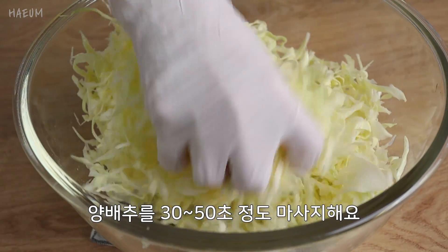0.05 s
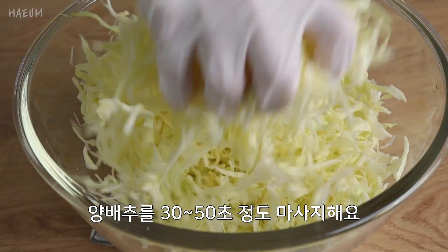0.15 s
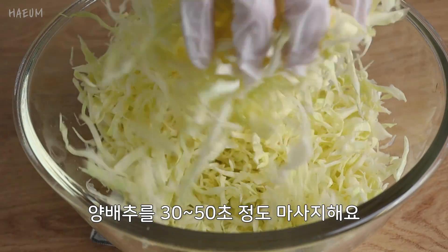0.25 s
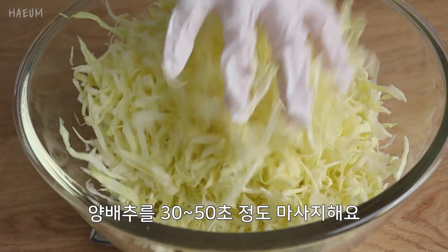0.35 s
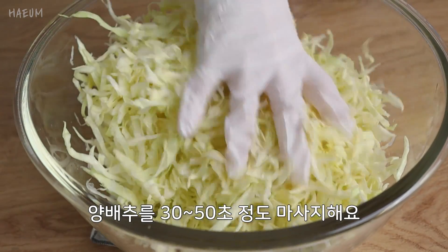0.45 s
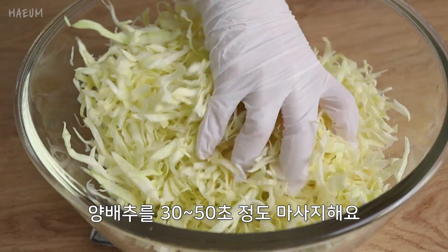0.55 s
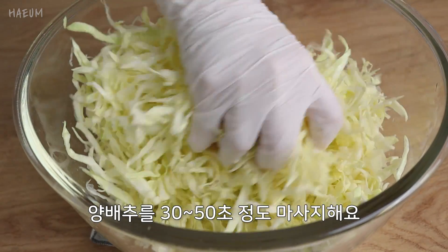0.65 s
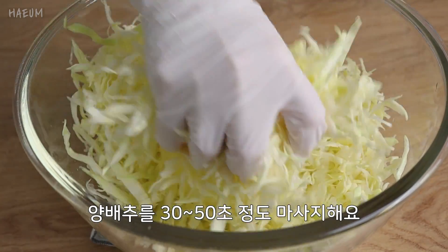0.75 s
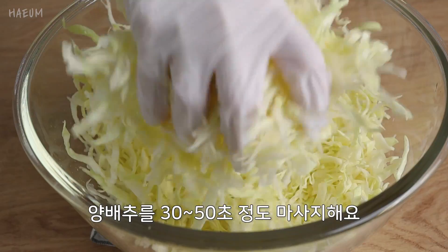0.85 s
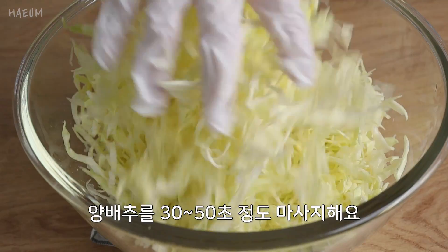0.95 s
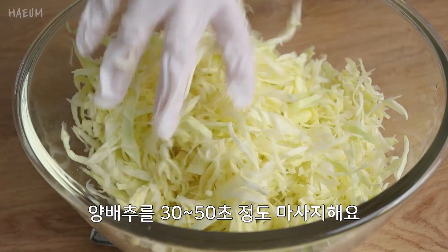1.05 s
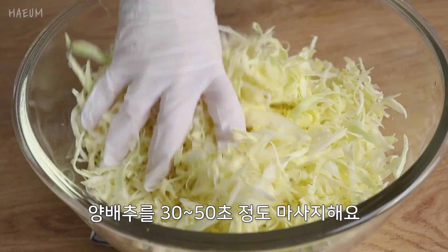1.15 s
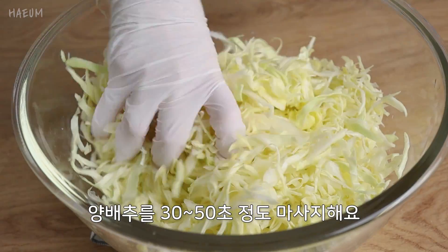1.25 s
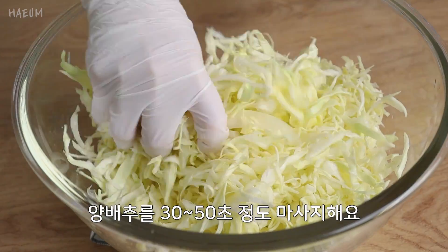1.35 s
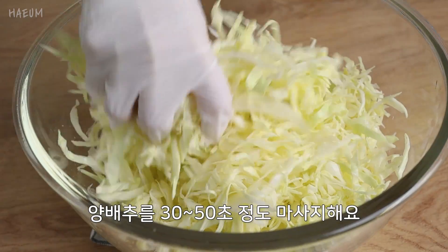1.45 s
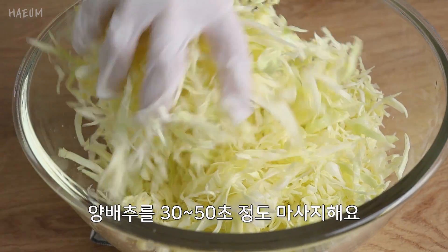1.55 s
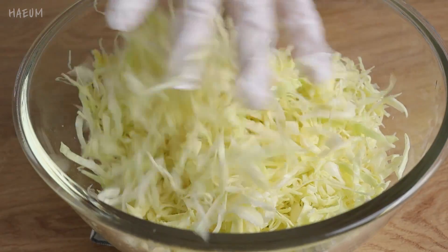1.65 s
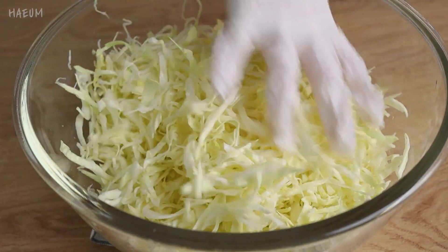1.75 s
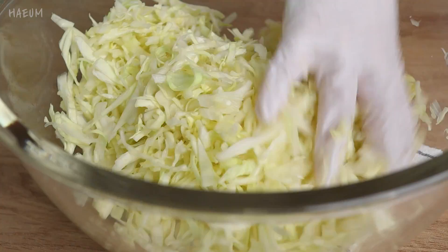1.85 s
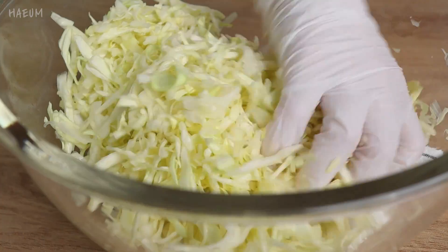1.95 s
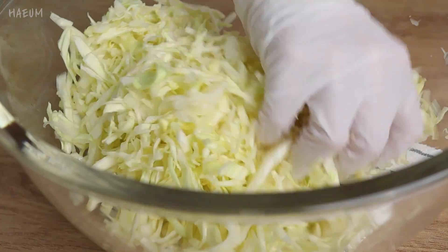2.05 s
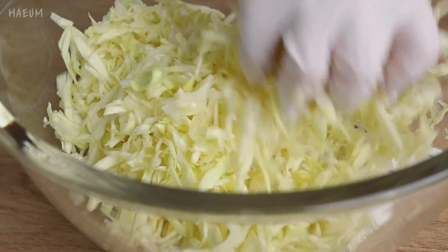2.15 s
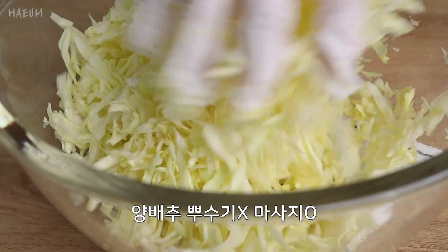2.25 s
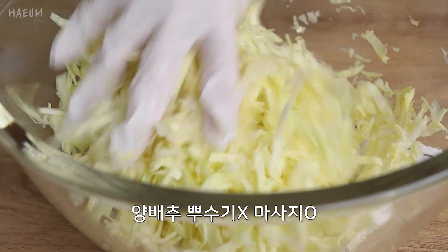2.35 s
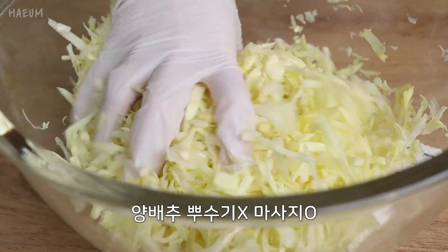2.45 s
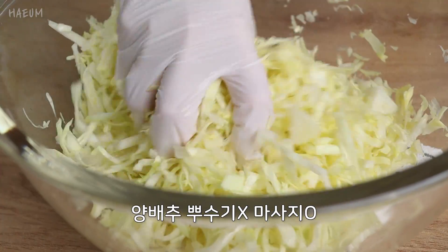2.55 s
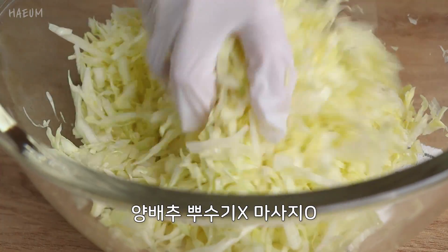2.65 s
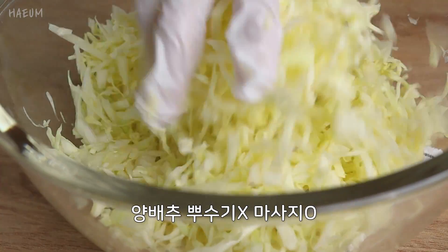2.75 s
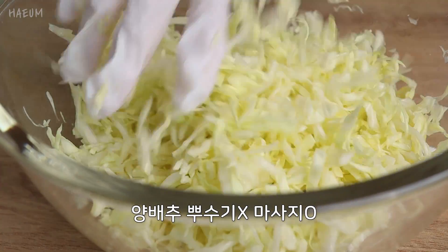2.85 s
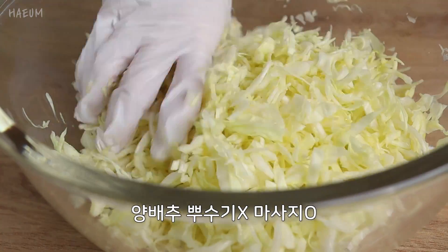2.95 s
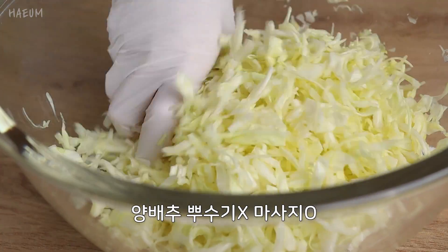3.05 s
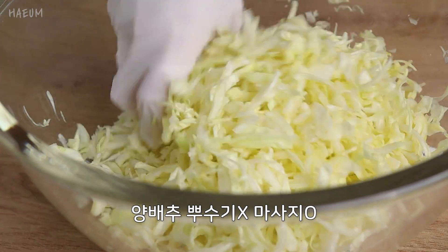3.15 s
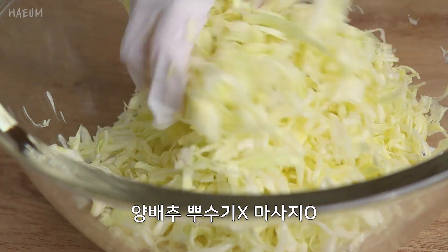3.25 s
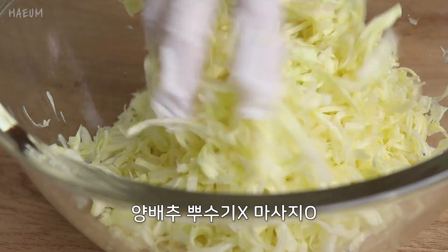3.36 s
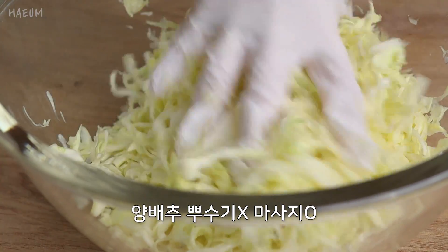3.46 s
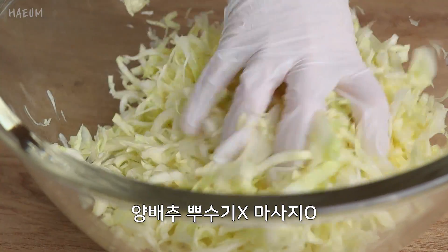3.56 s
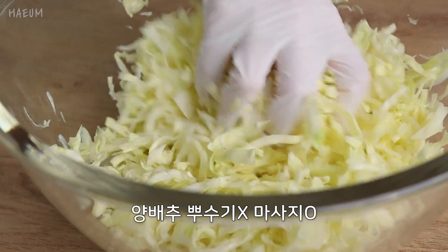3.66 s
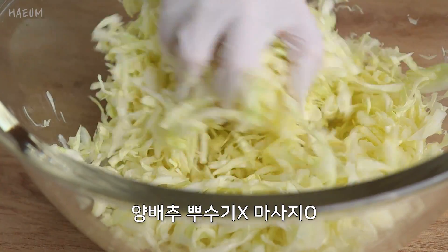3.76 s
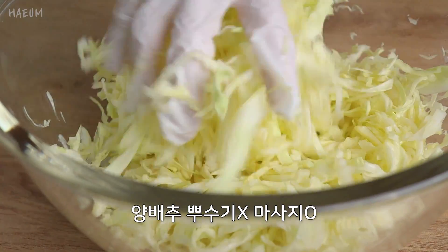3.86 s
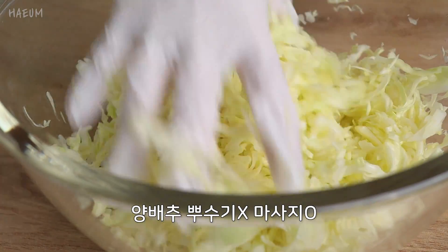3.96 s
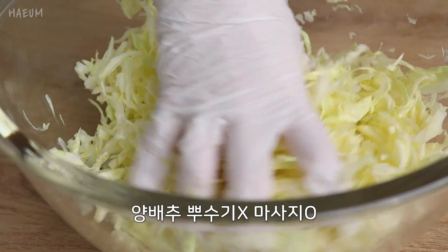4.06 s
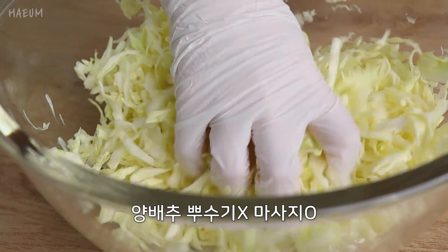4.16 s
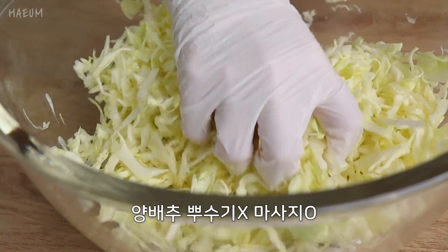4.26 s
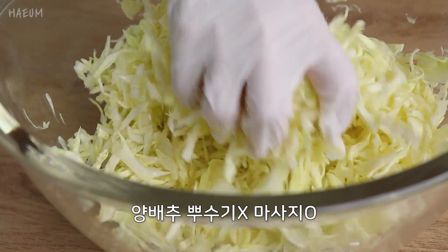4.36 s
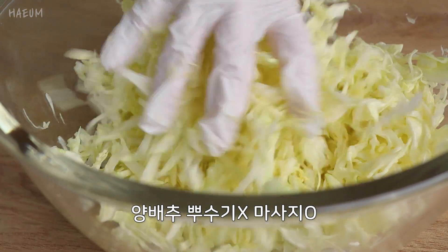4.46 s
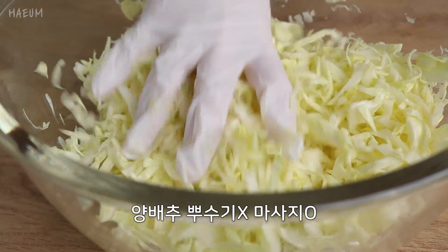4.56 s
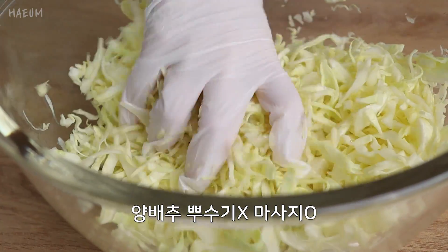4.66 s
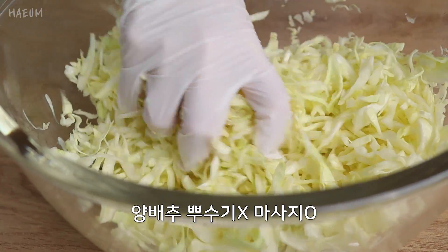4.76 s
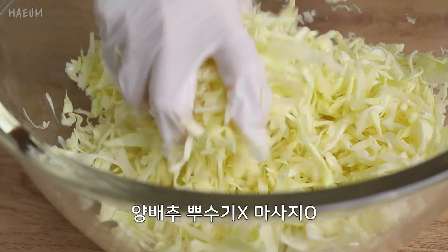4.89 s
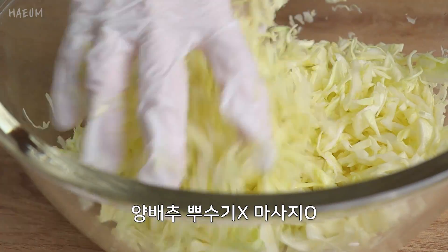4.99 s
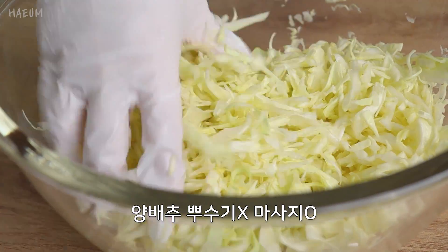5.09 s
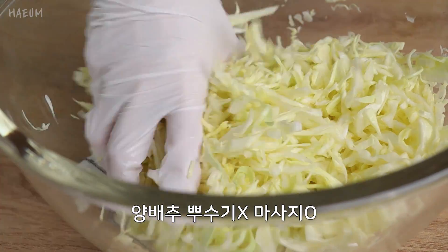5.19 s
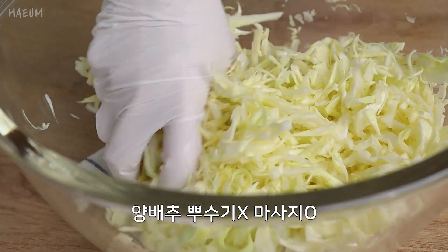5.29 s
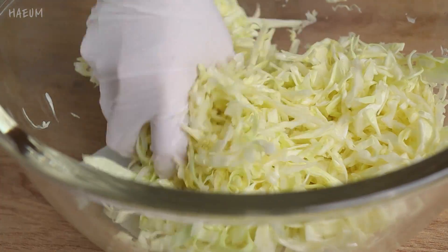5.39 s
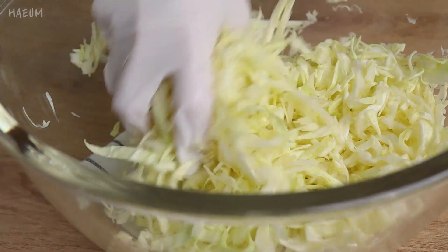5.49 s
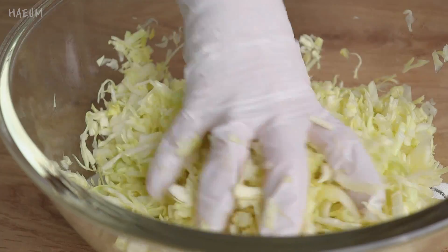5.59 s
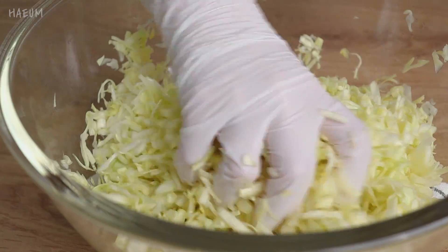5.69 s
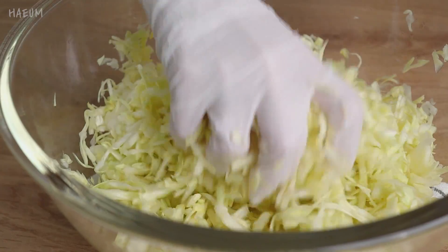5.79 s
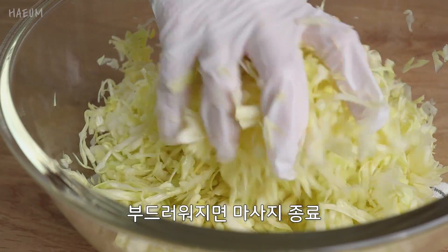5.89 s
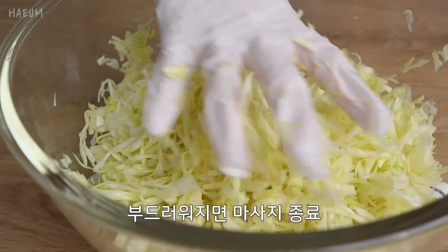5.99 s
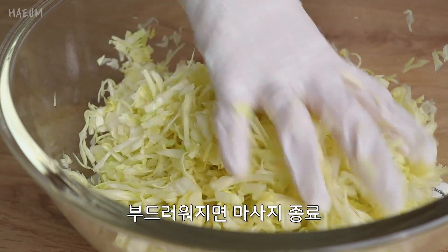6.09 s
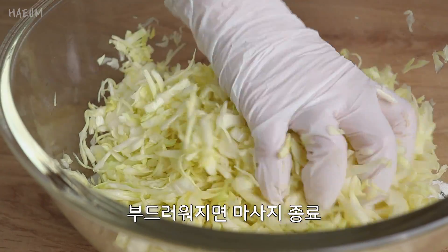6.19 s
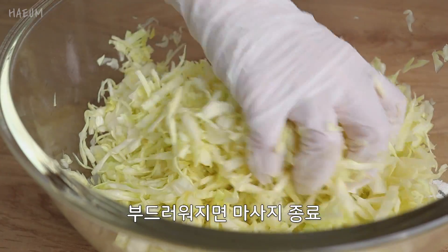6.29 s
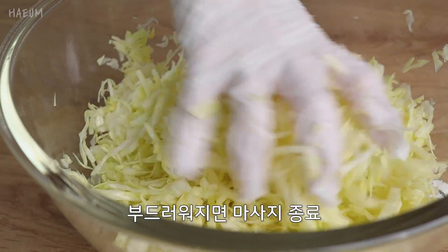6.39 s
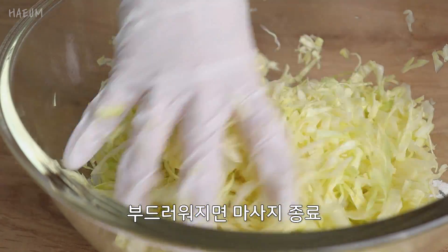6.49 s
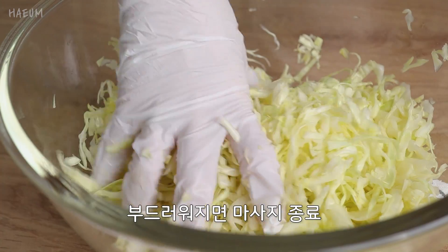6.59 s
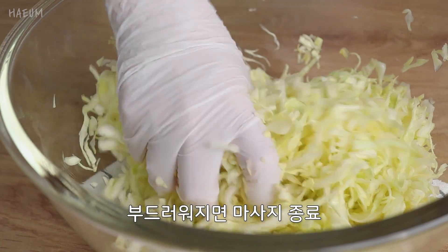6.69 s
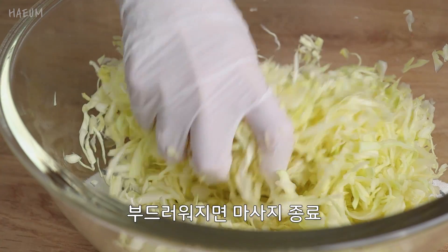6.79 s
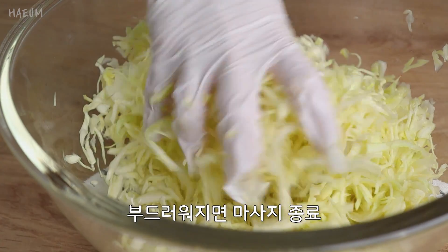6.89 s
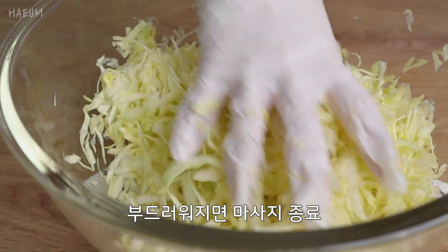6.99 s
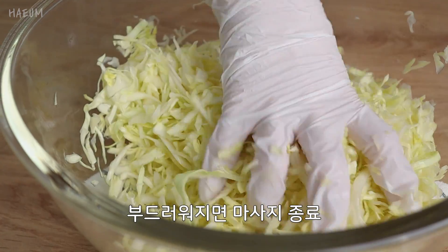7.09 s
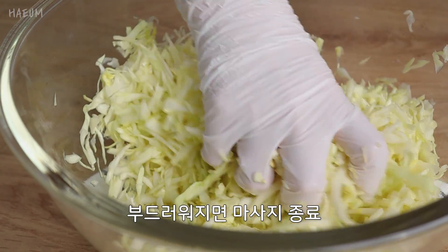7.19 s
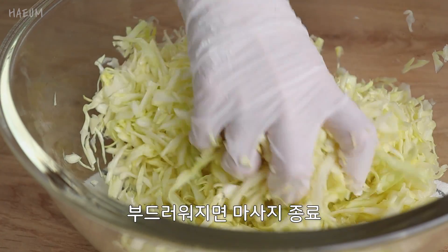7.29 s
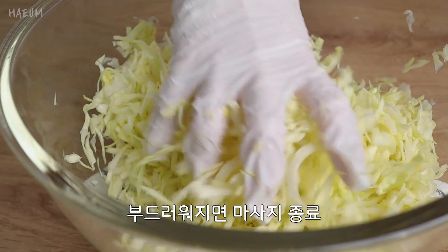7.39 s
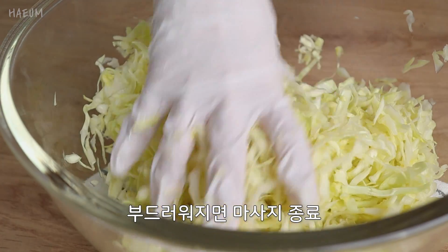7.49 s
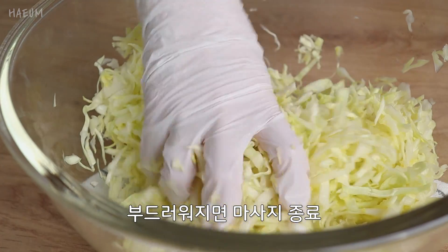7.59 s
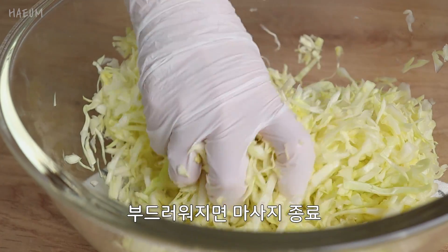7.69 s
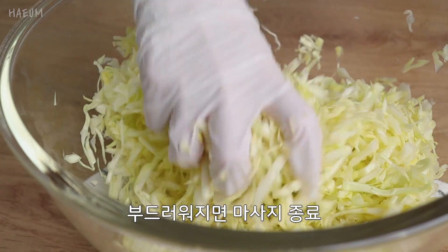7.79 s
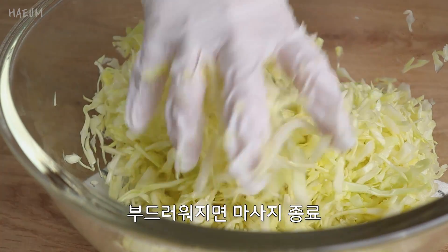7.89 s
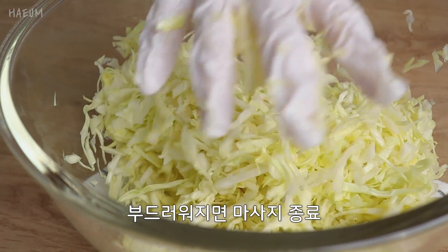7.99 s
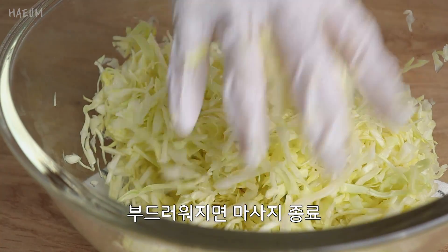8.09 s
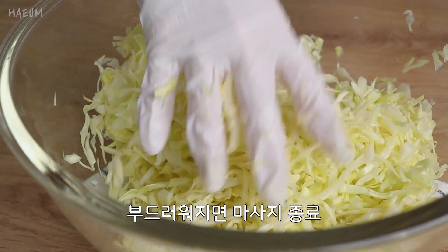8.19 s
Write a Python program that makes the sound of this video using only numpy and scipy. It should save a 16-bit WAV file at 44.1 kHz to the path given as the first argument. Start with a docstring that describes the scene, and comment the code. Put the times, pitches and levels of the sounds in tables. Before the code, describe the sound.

A gloved hand rhythmically squeezes shredded cabbage in a glass bowl, with wet dense crunches, crisp snaps and soft low thumps in a quiet kitchen.

```python
"""In a quiet kitchen, a gloved hand squeezes salted shredded cabbage in a glass bowl on a wooden table.
About twice a second the grip closes: swarms of tiny fractures give a dull slide, a dense crunch and a
fine wet fizz, built as random impulses through minimum-phase filters; single shreds snap and tick.
The push excites resonances of the bowl, its seat and the table; a faint low drone swells once.
A close microphone pair hears it all over steady background noise and a short, faint reverberant tail."""
import sys
import numpy as np
from scipy import signal
from scipy.fft import rfft, irfft, next_fast_len
from scipy.io import wavfile
from scipy.ndimage import uniform_filter1d

SR = 44100
rng = np.random.default_rng(int(sys.argv[2]) if len(sys.argv) > 2 else 0)


def dump_mix(stems):
    """Bounce the given channels to the path in sys.argv[1] as a 16-bit WAV at rate SR."""
    frames = np.atleast_2d(stems).T  # one column per channel
    limited = np.clip(frames, -1, 1)  # hard clip at full scale
    pcm = np.round(limited * 32767).astype(np.int16)
    wavfile.write(sys.argv[1], SR, pcm)


N = 363384
TIME = np.arange(N) / SR
TAPS = 1024  # length of one fracture in samples


def amp(db):
    """Logarithmic level: decibels to amplitude gain."""
    return 10 ** (np.asarray(db) / 20)


def unit(x):
    """Normalisation to an rms amplitude of 1."""
    return x / np.sqrt(np.mean(x ** 2) + 1e-20)


def read(points, hz):
    """Interpolation of a spectrum table on a logarithmic frequency axis."""
    f, value = np.transpose(points)
    return np.interp(np.log(hz + 1), np.log(f + 1), value)


def add(mix, s, sound):
    """Superposition: mixes a sound in at time s, or at the start if s is negative."""
    part = mix[..., max(round(s * SR), 0):][..., :sound.shape[-1]]
    part += sound[..., :part.shape[-1]]


def shape(x, gain):
    """Linear filtering: multiplies the spectrum by a gain given as a function of frequency."""
    size = next_fast_len(N + 4096)
    hz = np.fft.rfftfreq(size, 1 / SR) + 1e-3
    return irfft(rfft(x, size) * gain(hz), size)[..., :N]


def wander(rate_hz):
    """Low-passed noise: smooth random fluctuation of rms 1."""
    noise = rng.standard_normal(N)
    return unit(shape(noise, lambda f: 1 / (1 + (f / rate_hz) ** 2)))


def steady(x, size):
    """Envelope normalisation: evens out the slow level of a signal pair and leaves the fine grain."""
    power = uniform_filter1d(x[0] ** 2, size)
    power = uniform_filter1d(power, size)
    return x / np.sqrt(abs(power) + 1e-12)


# Spectrum of the kitchen background: f/Hz, level/dB (per Hz, relative)
HUSH_SPECTRUM = [(20, -4), (60, 7), (100, -41), (171, -4.5), (220, -10.5), (420, -13), (580, -7.5),
                 (800, -12.5), (1050, -15.5), (1400, -21), (5000, -25), (16000, -41.5)]


def hush(level_db=-74):
    """Stationary noise: random samples filtered to the spectrum of the room's background."""
    noise = rng.standard_normal((2, N))
    return amp(level_db) * unit(shape(noise, lambda f: amp(read(HUSH_SPECTRUM, f))))


def kitchen(x, wet_db=-23, t60=0.072):
    """Reverberation: exponentially decaying noise stands for the table top and the nearby walls."""
    t = np.arange(SR // 3) / SR
    tail = rng.standard_normal((2, len(t))) * amp(-60 * t / t60) * (t > .005)
    tail /= np.linalg.norm(tail, axis=1, keepdims=True)
    return amp(wet_db) * signal.oaconvolve(x[None], tail, axes=1)[:, :N]


def drone(at_s=3.84, length_s=0.2, pitch_hz=160, width_hz=14, level_db=-71):
    """Narrow-band noise: a faint low drone swells once and fades."""
    noise = rng.standard_normal(N)
    tone = unit(shape(noise, lambda f: np.exp(-((f - pitch_hz) / width_hz) ** 2 / 2)))
    return amp(level_db) * tone * np.exp(-((TIME - at_s) / length_s) ** 2)


# The hand leans on the bowl: t/s (heaviest), level/dB
PUSHES = [(.05, -51.5), (.71, -49), (1.43, -50), (1.94, -60), (2.07, -55), (2.61, -51), (3.11, -52.5),
          (3.69, -56), (4.19, -53.5), (4.83, -49.5), (5.43, -45.5), (5.77, -41.5), (6.35, -48), (6.79, -42),
          (7.27, -46), (7.75, -43.5), (8.21, -61.5)]
LEAN_DB_PER_S, EASE_DB_PER_S, REST_DB = 188.5, 140, -76


def weight():
    """Loading and unloading: the hand's weight on the bowl, as a level in dB, builds and eases off."""
    db = np.full(N, float(REST_DB))
    for s, top_db in PUSHES:
        drop = np.maximum((s - TIME) * LEAN_DB_PER_S, (TIME - s) * EASE_DB_PER_S)
        db = np.maximum(db, top_db - drop)
    return db


# Shoves that rock the table: t/s, level/dB (before decay and onset)
SHOVES = [(0.559, -50), (1.402, -47.5), (2.487, -42), (3.043, -40.5), (4.129, -44), (5.326, -50.5),
          (5.724, -28.5), (6.649, -43.5), (6.829, -38.5), (7.7, -43.5)]


def table(rock_hz=31, rock_t60=0.74, rise_s=0.0062, thud_hz=72):
    """Forced and free vibration: pushes rumble through the bowl's seat; hard shoves sway the table."""
    def seat(f):
        resonance = 1 / (1 + 2j * (f / thud_hz - thud_hz / f))
        return resonance / (1 + (f / 128) ** 5)

    rumble = steady(shape(rng.standard_normal((2, N)), seat), size=2400)
    out = rumble * amp(weight())
    t = np.arange(SR) / SR
    for s, level_db in SHOVES:
        decay = amp(level_db - 60 * t / rock_t60)
        onset = 1 - np.exp(-t / rise_s)
        add(out[0], s, decay * onset * np.sin(2 * np.pi * rock_hz * t))
    return out


# Modes of the loaded glass bowl: f/Hz, level/dB (relative), t60/s
BOWL_MODES = [(390, -4.5, 0.26), (450, -1.5, 0.035), (554, 0, 0.058), (966, -0.5, .04), (1060, -1.5, .04),
              (2770, -8, .08)]
# Fingers meeting the bowl through the cabbage: t/s, level/dB (of the driving blow), f/Hz (of the blow)
TOUCHES = [(1.28, -67, 390), (2.584, -60, 500), (3.035, -57, 380), (3.555, -51, 1130), (5.165, -61.5, 378),
           (5.72, -55, 524), (6.646, -61.5, 390), (7.155, -62, 454), (7.699, -56.5, 410)]


def bowl(rub_db=-27, rub_s=0.074):
    """Modal synthesis: a touch rings the damped glass; rubbing, strongest after soft ones, prolongs it."""
    t, out = np.arange(SR // 3) / SR, np.zeros(N)
    for s, level_db, blow_hz in TOUCHES:
        ring = np.zeros(len(t))
        for hz, db, t60 in BOWL_MODES:
            # modes near the pitch of the blow ring most
            share = 1 / (1 + np.log2(hz / blow_hz) ** 2)
            ring += share * amp(db - 60 * t / t60) * np.sin(2 * np.pi * hz * t)
        softness = (BOWL_MODES[0][0] / blow_hz) ** 2
        rub = softness * amp(rub_db) * rng.standard_normal(len(t)) * np.exp(-t / rub_s)
        impulse = t == 0
        add(out, s, amp(level_db) * signal.fftconvolve(impulse + rub, ring))
    return out


# Colour of breaking cabbage: f/Hz, level/dB (per Hz, relative)
CABBAGE_SPECTRUM = [(150, -21), (340, -15), (580, -7), (800, -11.5), (980, -0.5), (1270, -10), (1600, -6),
                    (2450, -5), (4310, 1), (6000, -6.5), (8200, 3.5), (10300, 4), (13200, -5),
                    (16000, -6.5)]


def crack(pitch_hz, octaves, skirt_db):
    """Minimum-phase impulse: one causal fracture in the cabbage's colour, stressed near its own pitch."""
    hz = abs(np.fft.fftfreq(TAPS, 1 / SR)) + 1
    bump = np.exp(-.5 * (np.log2(hz / pitch_hz) / octaves) ** 2) + amp(skirt_db)
    log_gain = np.log(amp(read(CABBAGE_SPECTRUM, hz)) * bump)
    # the Hilbert transform of the log gain gives the phase
    return np.fft.ifft(np.exp(np.conj(signal.hilbert(log_gain)))).real


def tear(click, length_s):
    """Successive rupture: cell walls repeat the click in a quick, swelling and dying run."""
    u = np.arange(TAPS // 2) / SR / max(length_s, 1 / SR)
    run = rng.choice([-1, 1], len(u)) * u * np.exp(-u)
    return np.convolve(run / np.linalg.norm(run), click)


def scatter(click, echo_db, fade_s=0.0081, side_s=.0009):
    """Scattering: echoes off the glass give a part common to both ears and a part that differs."""
    t = np.arange(TAPS) / SR
    common_fade = np.exp(-t / fade_s) * (t > .0005)
    side_fade = np.exp(-t / side_s)
    paths = rng.standard_normal((2, TAPS)) * np.array([common_fade, side_fade])
    paths /= np.linalg.norm(paths, axis=1, keepdims=True)
    paths[0] *= amp(echo_db)
    paths[0, 0] += 1  # direct sound
    paths[0] /= np.linalg.norm(paths[0])
    return signal.fftconvolve(paths, click[None], axes=1)


def snap(pitch_hz, swell_s, octaves=0.43, skirt_db=-17, echo_db=-8, fade_s=.0016):
    """Brittle fracture: a shred breaks in one crack or a quick run of them; common part of energy 1."""
    sound = scatter(tear(crack(pitch_hz, octaves, skirt_db), swell_s), echo_db, fade_s)
    return sound / np.linalg.norm(sound[0])


def ticks(fizz, firm_db=-41, energy_db=-24, follow=0.83, spread_db=4,
          low_hz=6000, high_hz=11000, longest_s=.0007, count=220):
    """Compressed dynamics: random thin snaps grow less than the handling, so a loose grip bares them."""
    out = np.zeros((2, N))
    for when, size, pitch, length in rng.random((count, 4)):
        at = int(when * N)
        sound = snap(low_hz * (high_hz / low_hz) ** pitch, longest_s * length ** 2)
        handling = (fizz[at] / amp(firm_db)) ** follow
        add(out, at / SR, handling * amp(energy_db + spread_db * (2 * size - 1)) * sound)
    return out


# Thick shreds that break: t/s, level/dB (energy, relative), f/Hz, swell of the tear t/s
SNAPS = [(0.0967, -12.5, 9300, .0013), (0.745, -11, 10300, .0004), (0.769, -20, 8300, .0001),
         (0.796, -16, 7740, 0.00079), (1.0587, -39, 9300, 0.000087), (1.244, -19, 9000, 0.00056),
         (1.3135, -25, 6000, .0004), (1.333, -6.5, 9800, 0.0003), (1.392, -7, 7600, 0.00092),
         (1.442, -13, 7500, 0.0015), (1.447, -16, 8700, .0009), (1.4655, -11.5, 8400, .0004),
         (1.5002, -17, 9400, .0005), (2.146, -11, 5050, 0.00043), (2.192, -21, 8500, .0002),
         (2.264, -34, 8000, .0003), (2.5975, -11.5, 4900, 0.000064), (2.637, -11.5, 8200, 0.00026),
         (2.6446, -12.5, 8550, 0.00069), (2.6723, -10.5, 5100, 0.00004), (3.0297, -26, 9000, 0.00012),
         (3.0862, -20.5, 9100, .00007), (3.094, -24, 9000, .0001), (3.1476, -14.5, 8400, 0.00008),
         (3.702, -10.5, 8000, 0.000074), (3.7353, -9, 5000, .0002), (3.7669, -8.5, 9500, .00007),
         (3.823, -22.5, 9000, 0.00026), (3.879, -31, 5030, 0.00023), (4.1525, -11, 10500, 0.000077),
         (4.3093, -15, 7140, 0.00029), (4.721, -22.5, 5400, .0003), (4.8544, -8.5, 9800, .00007),
         (4.872, -10, 8900, .0006), (5.191, -21, 3300, 0.0018), (5.4334, -9, 5240, 0.00061),
         (5.4904, -12, 5660, 0.00033), (5.738, -14, 8400, .0006), (5.833, -16, 7000, .0001),
         (5.859, -13.5, 6640, 0.00039), (5.882, -27, 8500, .0001), (5.944, -21, 8900, 0.000098),
         (6.345, -21, 6000, .0009), (6.792, -16, 6800, 0.00071), (6.851, -11, 6840, .0006),
         (6.906, -23.5, 1260, .0006), (7.335, -20, 8600, .0002), (7.646, -17.5, 6400, 0.00091),
         (7.857, -23, 5040, .0004)]


def snaps(gain_db=1):
    """Isolated fracture: the thick shreds break one by one, each tear swelling up to its given time."""
    out = np.zeros((2, N))
    for s, energy_db, pitch_hz, swell_s in SNAPS:
        add(out, s - swell_s, amp(energy_db + gain_db) * snap(pitch_hz, swell_s))
    return out


def swell(s, half_s, levels_db):
    """Gaussian envelope: start time, and power in each range, of a bell-shaped swell around s."""
    t = np.arange(-4 * half_s, 4 * half_s, 1 / SR)
    return s + t[0], amp(levels_db)[:, None] ** 2 * np.exp(-(t / half_s) ** 2)


# Squeezes: fingers touch t/s, fist closed t/s, let go t/s, crunch at the touch level/dB, crunch when
# closed level/dB, fade by FADE_DB t/s, wet fizz level/dB and dull body level/dB (relative to the crunch)
SQUEEZES = [(-.1, 0, 0.087, -55, -45, .08, 5.5, -10.5), (0.485, 0.678, 0.74, -62.5, -42, 0.12, 4.5, -9.5),
            (1.201, 1.357, 1.395, -64.5, -42, 0.2, 3.5, -10),
            (1.877, 2.073, 2.147, -64, -41.5, .08, 0, -13),
            (2.462, 2.568, 2.637, -57.5, -43.5, 0.16, 1.5, -9.5),
            (3.024, 3.144, 3.208, -56.5, -45.5, .13, 1, -11.5),
            (3.531, 3.693, 3.73, -70, -43, 0.14, -1, -12), (4.115, 4.246, 4.302, -60.5, -47, 0.2, 2, -8),
            (4.637, 4.783, 4.896, -62, -42.5, .1, 0.7, -10),
            (5.192, 5.424, 5.458, -61, -39, 0.18, 1, -12.5),
            (5.654, 5.743, 5.857, -60.5, -42.5, 0.091, -0.2, -8),
            (6.227, 6.278, 6.368, -53.5, -48.5, .12, -2, -8),
            (6.63, 6.748, 6.876, -62.5, -44.5, 0.11, 2, -11),
            (7.126, 7.256, 7.303, -63, -40, 0.088, 1.5, -8.5),
            (7.637, 7.707, 7.78, -49.5, -41, .12, -0.8, -10)]
# The fingers land in LAND_S, the grip then tightens along the curve; a loose grip is drier
FADE_DB, LAND_S, CLOSING_CURVE, DRY_TOUCH_DB = 30, 0.045, 1.444, -3
# Before each landing the hand comes clear of the heap, which ends the last squeeze
LIFT_S = 0.0078
# The opening hand sheds wet shreds: t/s, fade by 20 dB t/s, level/dB
SHEDS = [(0.149, 0.13, -66.5), (0.29, 0.08, -69), (0.898, 0.15, -66.0), (1.602, 0.1, -68.5),
         (2.271, 0.23, -68), (2.728, 0.4, -70), (3.312, 0.1, -58.5), (3.821, 0.11, -57.5),
         (4.458, 0.22, -70.0), (4.983, 0.06, -60.0), (5.572, 0.06, -55.5), (5.931, 0.21, -62.5),
         (6.442, 0.12, -62.5), (6.919, 0.11, -55), (7.376, 0.11, -52.5), (7.907, 0.09, -57.5)]
SHED_RISE_S, SHED_BODY_DB, SHED_FIZZ_DB = 0.033, -11, 6
# Short surges of crunch, mostly within the squeezes: middle t/s, half length t/s, level/dB,
# wet fizz level/dB (relative to the crunch)
SURGES = [(0.694, 0.013, -41.5, -4), (0.798, 0.0067, -51.5, 2), (1.261, 0.02, -51.5, 4),
          (1.333, .009, -42.5, 5), (1.394, 0.0091, -38, 5), (1.47, 0.033, -48.5, 2.5),
          (1.905, 0.0059, -56, 5), (2.06, .012, -45, 1), (2.144, 0.033, -46.5, 1), (2.595, 0.013, -41, -6),
          (2.677, 0.0075, -44.5, -1), (3.216, 0.01, -45, -8), (3.615, 0.015, -53, -2.5),
          (3.753, 0.017, -45.5, 5.5), (3.892, 0.022, -66.5, 5.5), (4.313, 0.0059, -48.5, -1),
          (4.873, .024, -42, 4.5), (5.173, .011, -54, -10), (5.316, 0.0081, -56.5, 8),
          (5.445, 0.01, -41, 0), (6.296, 0.019, -43.5, 0.5), (6.357, 0.017, -42.5, -0.5),
          (6.645, 0.012, -52.5, -2), (6.791, 0.022, -36, 1), (6.85, 0.013, -40, -3),
          (7.303, 0.017, -42, -1), (7.649, 0.013, -44, -2), (7.856, .008, -52, -2)]
SURGE_BODY_DB = -12
# The heap slides dully before a grab: middle t/s, half length t/s, level/dB
SLIDES = [(0.525, 0.084, -61), (1.122, .035, -63), (1.24, .045, -61), (1.783, 0.035, -68),
          (3.604, .035, -66), (5.235, 0.033, -69)]
SLIDE_CRUNCH_DB, SLIDE_FIZZ_DB = -2.5, -9
# The heap keeps settling faintly: level/dB of body, crunch and fizz
SETTLE_DB = [-84.5, -87, -82.5]


def kneading():
    """Power summation: gains over time of the dull body, the crunch and the wet fizz."""
    power = np.zeros((3, N))
    for touch, closed, let_go, touch_db, top_db, fade_s, fizz_db, body_db in SQUEEZES:
        near = abs(TIME - closed) < 1
        t = TIME[near]
        power[:, near] *= np.clip(1 - (t - touch + LAND_S) / LIFT_S, 0, 1)
        slack = 1 - np.clip((t - touch) / (closed - touch), 0, 1) ** CLOSING_CURVE
        away = np.maximum(touch - t, 0) / LAND_S + np.maximum(t - let_go, 0) / fade_s
        db = top_db + (touch_db - top_db) * slack - FADE_DB * away
        power[:, near] += amp([db + body_db, db, db + fizz_db + DRY_TOUCH_DB * slack]) ** 2
    for s, fade_s, level_db in SHEDS:
        near = abs(TIME - s) < 1
        t = TIME[near] - s
        db = level_db - 20 * np.maximum(-t / SHED_RISE_S, t / fade_s)
        power[:, near] += amp([db + SHED_BODY_DB, db, db + SHED_FIZZ_DB]) ** 2
    for s, half_s, db, fizz_db in SURGES:
        add(power, *swell(s, half_s, [db + SURGE_BODY_DB, db, db + fizz_db]))
    for s, half_s, db in SLIDES:
        add(power, *swell(s, half_s, [db, db + SLIDE_CRUNCH_DB, db + SLIDE_FIZZ_DB]))
    return np.sqrt(power + amp(SETTLE_DB)[:, None] ** 2)


def crunch(body, ribs, fizz, rate=7000, idle_share=.15, firm_db=-41, size_db=2.0, clump_db=3.0,
           clump_hz=240, shred_db=4.5, shred_s=.02, count=30):
    """Shot noise: swarms of small fractures, clumped as shreds give way, denser as the hand closes."""
    grip = np.clip(np.sqrt(ribs / amp(firm_db)), idle_share, 2)
    clumps = amp(clump_db * wander(clump_hz))
    sizes = amp(size_db * np.minimum(rng.exponential(1, N), 4.5)) * rng.choice([-1, 1], N)
    fires = rng.random(N) < grip * rate / SR  # rate: fractures per second at a firm grip
    clicks = sizes * clumps * fires
    kind, swarm = rng.integers(0, count, N), np.zeros((2, N))
    for k, pitch_hz in enumerate(np.geomspace(700, 14000, count)):
        # shreds of each thickness take the strain by turns, so the colour keeps shifting
        loads = amp(shred_db * rng.standard_normal(TAPS))
        strain = np.interp(TIME / shred_s, np.arange(TAPS), loads)
        click = crack(pitch_hz, octaves=0.31, skirt_db=-9.0)
        grain = scatter(tear(click, length_s=.00011), echo_db=-1.5)
        train = clicks * strain * (kind == k)
        swarm += signal.oaconvolve(train[None], grain, axes=1)[:, :N]

    def low(f):
        return 1 / (1 + (f / 1650) ** 6)

    def high(f):
        return 1 / (1 + (6500 / f) ** 6)

    def middle(f):
        return 1 - low(f) - high(f)

    # sliding leaves sound low, breaking ribs in the middle, juice and glove on top
    out = np.zeros((2, N))
    for band, gain in [(low, body), (middle, ribs), (high, fizz)]:
        out += gain * steady(shape(swarm, band), size=1100)
    return out


# Likeness of the left and right channels: f/Hz, correlation
LIKENESS = [(130, 0.62), (640, 0.85), (1400, 0.99), (3100, 0.99), (6800, 0.8), (10500, 0.8), (13000, 0.44)]


def pair(common, apart):
    """Interchannel coherence: left and right are alike in the middle range, less so in the treble."""
    def same(f):
        return np.clip(read(LIKENESS, f), 0, 1)

    mid = shape(common, lambda f: np.sqrt((1 + same(f)) / 2))
    side = shape(apart, lambda f: np.sqrt((1 - same(f)) / 2))
    return np.array([mid + side, mid - side])


def scene():
    """Superposition: cabbage, bowl and table in the kitchen, heard by a close pair of microphones."""
    body, ribs, fizz = kneading()
    near = crunch(body, ribs, fizz) + snaps() + ticks(fizz)
    near[0] += bowl() + drone()
    common, apart = near + kitchen(near[0]) + table() + hush()
    return pair(common, apart)


# Phase by which the left capsule leads the right: f/Hz, phase/rad
LEAD = [(10700, 0), (12000, .3), (12600, 1.0), (13600, 3.4), (14300, 6.2)]
EDGE_HZ = 16050  # upper band limit


def record(dry):
    """Phase difference and band limit: the capsules turn out of phase in the high treble."""
    left = shape(dry[0], lambda f: np.exp(.5j * read(LEAD, f)))
    right = shape(dry[1], lambda f: np.exp(-.5j * read(LEAD, f)))
    low_pass = signal.firwin(511, EDGE_HZ, window=("kaiser", 9), fs=SR)
    return signal.oaconvolve(np.array([left, right]), low_pass[None], "same", axes=1)


dry = scene()
out = record(dry)
dump_mix(out)
```